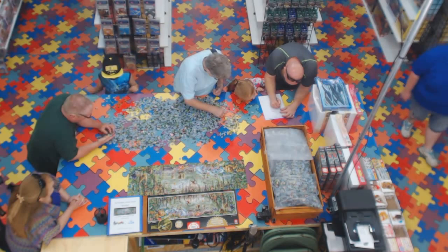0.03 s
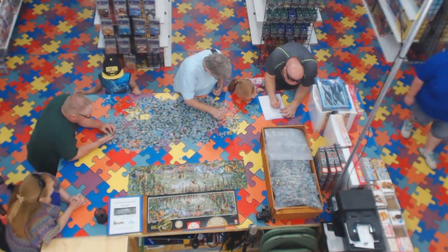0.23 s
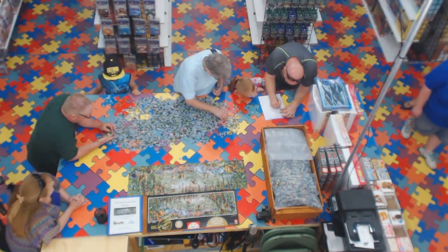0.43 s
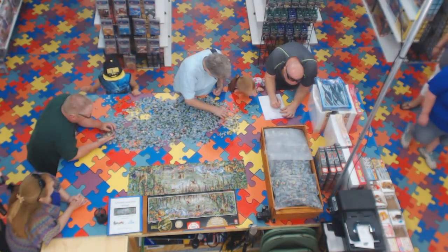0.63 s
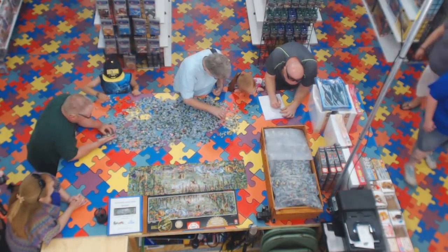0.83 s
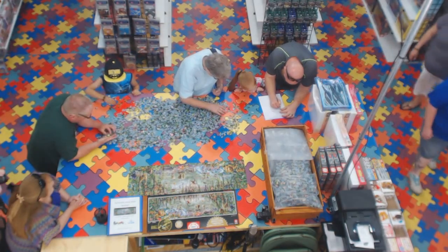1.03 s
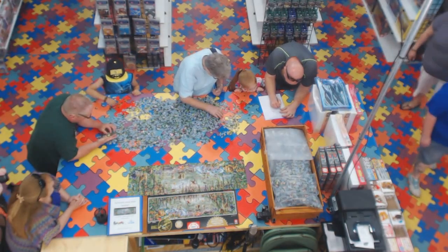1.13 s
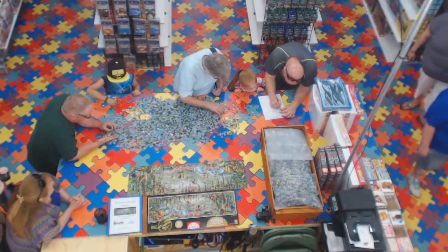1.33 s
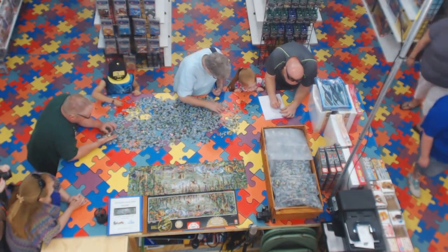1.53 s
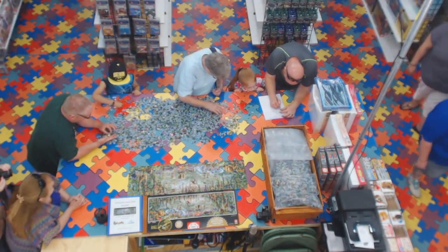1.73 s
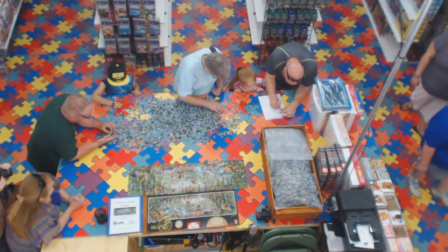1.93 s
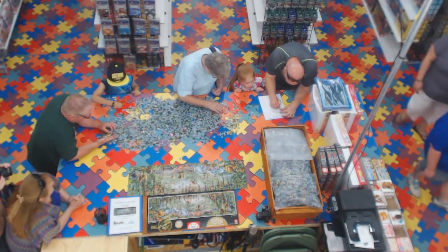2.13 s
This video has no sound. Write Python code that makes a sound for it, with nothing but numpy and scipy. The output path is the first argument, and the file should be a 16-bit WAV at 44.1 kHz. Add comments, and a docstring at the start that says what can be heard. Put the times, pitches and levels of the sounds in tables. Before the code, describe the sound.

Cardboard jigsaw pieces click and clatter sharply, then a hollow box is shoved along the floor

```python
"""Cardboard jigsaw pieces sorted by hand on a shop floor click, scuff and clatter: brief noise bursts are joined
by decaying sine partials. Twice something hollow, probably a puzzle box, is shoved along: stick-slip bumps are
low decaying sines, while grains of friction, filtered into three bands, give its boom, scrape and piece rattle.
Short sine tones, faint to strong, sound with or between the clicks; filtered noise gives a quiet room hum.
A short reverberation surrounds the handling; the narrow-band microphone limits and clips the hardest clicks."""
import sys
import numpy as np
from scipy import signal
from scipy.fft import rfft, irfft, next_fast_len
from scipy.io import wavfile
from scipy.ndimage import uniform_filter1d, minimum_filter1d, map_coordinates

SR = 44100
rng = np.random.default_rng(int(sys.argv[2]) if len(sys.argv) > 2 else 0)


def unload_wav(signal):
    """Save mono or channel-first audio to the path in sys.argv[1] as 16-bit WAV at rate SR, clipped to [-1, 1]."""
    wavfile.write(
        sys.argv[1],
        SR,
        np.round(np.clip(np.atleast_2d(signal).T, -1, 1) * 32767).astype(np.int16),
    )


N = 96402
T = np.arange(N) / SR  # seconds
BAND_HZ = 7600  # upper edge of all filtered noise
RING_DETUNE, RING_ROUGH_RAD = 0.009, 0.3  # random pitch share, random phase


def amp(db):
    """Level to amplitude: 20 dB is a factor of ten."""
    return 10 ** (np.asarray(db) / 20)


def unit(x):
    """Normalisation: scale to an rms of 1."""
    return x / np.sqrt(np.mean(x ** 2) + 1e-20)


def wobble(steps):
    """Random modulation: a smooth curve through one random knot per step."""
    knots = rng.standard_normal(int(steps.max()) + 4)
    return map_coordinates(knots, [steps])


def stroke(t, rise, hold, t60):
    """Exponential build-up and decay: rise, hold, then fall 60 dB in t60 seconds."""
    build_up = 1 - np.exp(-t / rise)
    decay = amp(-60 * np.maximum(t - hold, 0) / t60)
    return build_up * decay


def grains(size, rate, spread_db):
    """Random impulse train: tiny contacts, rate a second, of either sign and uneven size."""
    happens = rng.random(size) < rate / SR
    sign = rng.choice([-1, 1], size)
    return unit(happens * sign * amp(spread_db * rng.standard_normal(size)))


TILT_PIVOT_HZ = 5000


def coloured(x, points, bright_db=0):
    """Spectral shaping: an f/Hz, level/dB curve, tilted by bright_db an octave in the treble, at rms 1."""
    hz = np.fft.rfftfreq(len(x), 1 / SR) + 1
    f, db = np.transpose(points)
    curve = np.interp(np.log(hz), np.log(f), db)
    # below half the pivot the tilt stays level
    octaves = np.log2(np.clip(hz, TILT_PIVOT_HZ / 2, None) / TILT_PIVOT_HZ)
    gain = amp(curve + bright_db * octaves) * (hz < BAND_HZ)
    return unit(irfft(rfft(x) * gain, len(x)))


RAGGED_DB, RAGGED_STEP_HZ = 5, 240


def ragged(x):
    """Individual resonance: every piece has uneven peaks and dips of its own along the spectrum."""
    hz = np.fft.rfftfreq(len(x), 1 / SR)
    gain = amp(RAGGED_DB * wobble(hz / RAGGED_STEP_HZ))
    return unit(irfft(rfft(x) * gain, len(x)))


PATCHY_DB = 3


def patchy(x):
    """Time-varying resonance: patches of the spectrum come and go as the pieces shift."""
    spectrum = signal.stft(x, nperseg=512)[2]
    field = uniform_filter1d(rng.standard_normal(spectrum.shape), size=3, axis=0)  # across frequency
    field = uniform_filter1d(field, size=5, axis=1)  # across time
    gain = amp(PATCHY_DB * unit(field))
    return unit(signal.istft(spectrum * gain, nperseg=512)[1][:len(x)])


def add(track, s, x):
    """Superposition: mix x into track at s seconds."""
    part = track[max(round(s * SR), 0):][:len(x)]
    part += x[:len(part)]


# spectrum of the room hum: f/Hz, level/dB
HUM_SPECTRUM = [(40, -28), (95, -41), (125, 5), (255, 5.5), (410, -5.5), (650, -2.5), (1500, -7),
                (2600, -12), (4600, -14), (7400, -11)]
HUM_DB = -45.5


def room_hum():
    """Stationary noise: random noise shaped into the hum of a quiet room."""
    return amp(HUM_DB) * coloured(rng.standard_normal(N), HUM_SPECTRUM)


# partials of the short ring in clicks and scuffs, before random scatter: f/Hz, level/dB
RING_PARTIALS = [(680, -19.5), (4030, -8.5), (6030, -12), (6700, -13)]
RING_SCATTER_DB = 2
RING_SHARP, RING_SETTLE_S = 0.04, 0.008  # share of the pitch at the start, time constant
RING_T60_S, RING_PIVOT_HZ, RING_DAMPING = 0.085, 700, 0.3  # T60 at the pivot, exponent of its fall


def ring(t, hold):
    """Additive synthesis: sine partials build up, sag slightly in pitch and decay; higher ones die sooner."""
    settled = t + RING_SHARP * RING_SETTLE_S * (1 - np.exp(-t / RING_SETTLE_S))
    out = np.zeros(len(t))
    for hz, db in RING_PARTIALS:
        level = amp(db + RING_SCATTER_DB * rng.normal())
        t60 = RING_T60_S * (RING_PIVOT_HZ / hz) ** RING_DAMPING
        pitch = hz * (1 + RING_DETUNE * rng.normal())
        phase = 2 * np.pi * (pitch * settled + rng.random())
        roughness = RING_ROUGH_RAD * wobble(t * 200)
        out += level * stroke(t, hold / 2, hold, t60) * np.sin(phase + roughness)
    return out


CLICK_RISE_S = 0.00022
HOLLOW_HZ, HOLLOW_T60_S = 1992, 0.057  # pitch once settled
OVERTONE_DB, FLUTTER_DB = -16, 2.4
# two-step settling of the hollow tone, which starts sharp: excess pitch/share, time constant/s
HOLLOW_SETTLING = [(0.55, 0.001), (0.13, 0.0087)]


def hollow(t, hold):
    """Frequency glide: a fluttering hollow tone and its octave drop quickly onto their pitch."""
    excess = sum(share * np.exp(-t / tau) for share, tau in HOLLOW_SETTLING)
    hz = HOLLOW_HZ * (1 + RING_DETUNE * wobble(t * 150) + excess)
    phase = 2 * np.pi * np.cumsum(hz) / SR
    tone = np.sin(phase) + amp(OVERTONE_DB) * np.sin(2 * phase)
    flutter = amp(FLUTTER_DB * wobble(t * 400))
    return flutter * stroke(t, CLICK_RISE_S, hold, HOLLOW_T60_S) * tone


# noise spectrum of cardboard contact, in scuffs and clicks, before tilt: f/Hz, level/dB
CARDBOARD_SPECTRUM = [(100, -26.5), (400, -12), (680, -2), (1100, -9.5), (1600, -5.5), (2900, -1.5),
                      (5200, 0), (6700, 0), (7500, -3.5)]
# pieces scuffing over each other: t/s, length/s, level/dB, treble tilt/dB per octave
SCUFF_EVENTS = [(.008, 0.035, -30, 13), (0.145, 0.029, -21, -18), (0.191, 0.044, -35.5, 1),
                (0.274, 0.035, -24.5, 7), (0.351, 0.05, -18.5, 5.5), (0.431, 0.044, -29, 7),
                (0.969, 0.029, -24.5, -2), (1.498, 0.044, -25.5, 7), (1.733, 0.048, -27, -3.5),
                (1.882, 0.043, -43, -5.5), (1.994, 0.043, -29.5, -8.5), (2.121, 0.031, -30, -14)]
SCUFF_RISE_S, SCUFF_T60_S = 0.01, 0.042


def scuffs():
    """Friction: cut edges catch on each other in a quick run of grains, joined by ringing partials."""
    out, t = np.zeros(N), T[:SR // 5]
    for s, length, db, bright_db in SCUFF_EVENTS:
        catches = grains(len(t), rate=2000, spread_db=0.5)
        rub = patchy(ragged(coloured(catches, CARDBOARD_SPECTRUM, bright_db)))
        rub = rub * stroke(t, SCUFF_RISE_S, length, SCUFF_T60_S)
        ringing = amp(3.0) * ring(t, length)
        hollow_tone = amp(-14.5) * hollow(t, length) * (1 - np.exp(-t / SCUFF_RISE_S))
        add(out, s, amp(db) * (rub + ringing + hollow_tone))
    return out


# pieces clicking: t/s, level/dB, contact length/s, hollow tone level/dB, treble tilt/dB per octave
CLICK_EVENTS = [(0.013, -29, 0.026, -30, 6.5), (0.032, -15, 0.001, -34, 29), (0.163, 10.5, 0.0037, -15, 10),
                (0.197, -26.5, 0.0016, -59, 3), (.203, -20, 0.00066, -48, 8), (.210, -33, 0.002, -51, 5),
                (0.235, -23.5, 0.01, -36, 8), (0.2913, -8.5, 0.0027, -24, 29),
                (0.315, -17.5, 0.013, -22.5, 10), (0.333, -12.5, 0.0033, -19, -0.5),
                (0.3394, 9, 0.0025, -3, 3), (0.3418, 1.5, 0.0085, -3.5, 5.5), (0.364, -14, 0.0044, -37, 10),
                (.374, -16, 0.0025, -46, 1), (0.383, -4, 0.0057, -44, 12), (.400, -22.5, 0.001, -39, 13),
                (0.439, -22, 0.0091, -58, 15), (.456, -26.5, 0.0026, -37.5, 11),
                (0.645, -21, 0.023, -49, 3), (0.674, -20, 0.015, -41.5, 0), (0.816, -20, 0.0035, -21, -17),
                (0.845, -25.5, 0.0042, -25, 8), (.920, -22.5, 0.0062, -42.5, -4),
                (.957, -26, 0.0076, -45, -1), (0.986, -21, 0.0047, -39, 8), (1.09, -32, 0.021, -38.5, -45),
                (1.156, -38, 0.0024, -53, -5.5), (1.215, -40, 0.0098, -56, 9),
                (1.439, -34.5, 0.0012, -70, -4), (1.4947, -17, 0.0048, -56, 11),
                (1.5059, -15, 0.0045, -37, 8.5), (1.528, -23, 0.0029, -45, 1.5),
                (1.5997, -15, 0.0051, -25, 18), (1.731, -23.5, 0.0051, -47, 2.5),
                (1.74, -11, 0.00089, -33, 7), (1.762, -26.5, 0.0073, -31, 6),
                (1.781, -15.5, 0.0013, -35, 1), (1.791, -22.5, 0.0077, -30.5, 5),
                (1.851, -38.5, 0.0022, -51, 3), (1.9, -24, 0.0075, -47, 8.5),
                (1.9972, -31.5, 0.014, -38, -5), (2.0483, -29, 0.0063, -18.5, -27),
                (2.122, -32, .003, -43, -6), (2.136, -30, 0.0054, -38, -3)]
CLICK_T60_S = 0.012
RING_LIMIT_DB = -9  # the ring's gain saturates towards this level in hard clicks


def clicks():
    """Impact: each click is a brief noise burst of contact chatter, a short ring and a hollow tone."""
    out, t = np.zeros(N), T[:SR // 5]
    for s, db, hold, hollow_db, bright_db in CLICK_EVENTS:
        contact = stroke(t, CLICK_RISE_S, hold, CLICK_T60_S)
        noise = ragged(coloured(rng.standard_normal(len(t)), CARDBOARD_SPECTRUM, bright_db))
        chatter = unit(noise * contact) * np.sqrt(np.mean(contact ** 2))
        ringing = ring(t, hold) / np.sqrt(1 + amp(db - RING_LIMIT_DB) ** 2)
        add(out, s, amp(db) * (chatter + ringing) + amp(hollow_db) * hollow(t, hold))
    return out


# short sine tones, faint to strong, with or between the clicks: t/s, level/dB, f/Hz, length/s
TONE_EVENTS = [(0.069, -39, 765, 0.029), (0.344, -12, 574, .003), (0.344, -2, 6060, .003),
               (0.376, -20, 639.5, 0.012), (0.977, -26.5, 640, 0.019), (.99, -39.5, 242, 0.077),
               (0.995, -19.5, 4020, 0.0028), (1.0, -28, 1228, 0.025), (1.032, -27.5, 950, 0.014),
               (1.599, -19, 3865, 0.0034), (1.685, -35.5, 144, 0.048), (1.871, -32.5, 722, 0.015),
               (2.051, -28.5, 705, 0.0057)]
TONE_RISE_S, TONE_T60_S = 0.002, 0.048


def tones():
    """Damped oscillation: short sine tones, faint to strong, slightly rough in phase."""
    out, t = np.zeros(N), T[:SR // 4]
    for s, db, hz, length in TONE_EVENTS:
        roughness = RING_ROUGH_RAD * wobble(t * 120)
        tone = np.sin(2 * np.pi * hz * t + roughness)
        add(out, s, amp(db) * tone * stroke(t, TONE_RISE_S, length, TONE_T60_S))
    return out


# noise spectrum of the box's boom: f/Hz, level/dB
BOOM_SPECTRUM = [(60, -53), (105, -54), (150, -1), (180, -12), (245, -8.5), (288, 4), (325, -10),
                 (360, 0.5), (450, -13), (700, -37)]
# noise spectrum of the box's scrape: f/Hz, level/dB
SCRAPE_SPECTRUM = [(280, -51), (440, -21.5), (550, -1.5), (720, -1.5), (1050, -6.5), (1200, 0),
                   (1450, -10.5), (1640, -5.5), (1900, -26.5), (3000, -29.5)]
# noise spectrum of the loose pieces' treble rattle: f/Hz, level/dB
RATTLE_SPECTRUM = [(1100, -14), (1900, 14.5), (2600, 9), (3500, 11), (5000, 2.5), (7000, 6), (8000, -33.5)]
# course of the two shoves, levels before the gains below: t/s, boom level/dB, scrape level/dB, rattle level/dB
SHOVE_COURSES = [
    [(.61, -55, -51, -36.5), (.635, -27, -23, -34), (.70, -24, -26, -27.5), (.76, -17, -15.5, -24.5),
     (.82, -19.5, -18, -19), (.885, -31, -22, -28.5), (.94, -40.5, -34, -33), (1.03, -58, -44, -42.5),
     (1.12, -59, -38.5, -50)],
    [(1.538, -34, -39, -46), (1.56, -37, -29, -71), (1.61, -20.5, -21.5, -35), (1.66, -26, -30.5, -74),
     (1.72, -42.5, -33.5, -40), (1.80, -72, -41.5, -51)],
]
BOOM_DB, SCRAPE_DB, RATTLE_DB = 4, 1.5, -2


def shoves():
    """Sliding friction: grains of contact make the box boom and scrape while the pieces rattle."""
    out = np.zeros(N)
    for course in SHOVE_COURSES:
        s, *levels = np.transpose(course)
        gate = np.interp(T, [s[0] - 0.01, s[0], s[-1], s[-1] + 0.02], [0, 1, 1, 0])
        boom_env, scrape_env, rattle_env = [gate * amp(np.interp(T, s, db)) for db in levels]
        boom = coloured(grains(N, rate=1800, spread_db=0), BOOM_SPECTRUM)
        scrape = patchy(coloured(grains(N, rate=4000, spread_db=2.5), SCRAPE_SPECTRUM))
        rattle = patchy(coloured(grains(N, rate=1100, spread_db=4), RATTLE_SPECTRUM))
        out += amp(BOOM_DB) * boom_env * boom
        out += amp(SCRAPE_DB) * scrape_env * scrape
        out += amp(RATTLE_DB) * rattle_env * rattle
    return out


# slips of the juddering box: t/s, level/dB, f/Hz
BUMP_EVENTS = [(0.6237, -8.5, 316), (0.647, 0, 300.5), (0.682, -7.5, 286), (0.706, -7, 280),
               (0.7358, 0, 534.5), (0.741, 1.5, 283), (0.771, -3.5, 325), (1.542, -6.5, 277.4),
               (1.5618, -0.5, 281), (1.582, -3, 275), (1.605, -6.5, 254)]
BUMP_RISE_S, BUMP_T60_S = 0.0056, 0.051


def bumps():
    """Stick-slip: the box catches and slips; each slip rings its panel for a few cycles."""
    out, t = np.zeros(N), T[:SR // 5]
    for s, db, hz in BUMP_EVENTS:
        panel = np.sin(2 * np.pi * hz * t)
        add(out, s, amp(db) * panel * stroke(t, BUMP_RISE_S, BUMP_RISE_S, BUMP_T60_S))
    return out


ROOM_T60_S, ROOM_DB = 0.16, -21.5


def room(x):
    """Reverberation: convolution with decaying noise gives the short answer of a carpeted shop."""
    t = T[:SR // 2]
    tail = rng.standard_normal(len(t)) * stroke(t, 0.002, 0, ROOM_T60_S)
    return signal.fftconvolve(x, tail / np.linalg.norm(tail))[:N]


def scene():
    """Superposition: pieces and box in the room, over its hum."""
    hum = room_hum()
    handling = scuffs() + clicks() + tones() + shoves() + bumps()
    return (handling + amp(ROOM_DB) * room(handling) + hum)[None]


def lowpass(x, hz, order):
    """Band limitation: a steep low-pass without phase shift."""
    size = next_fast_len(N + SR // 5)
    f = np.fft.rfftfreq(size, 1 / SR)
    gain = 1 / np.sqrt(1 + (f / hz) ** (2 * order))
    return irfft(rfft(x, size) * gain, size)[..., :N]


KNEE, SQUEEZE, RECOVER_S = 0.72, 0.68, 0.016  # amplitude, exponent of gain reduction, window length


def limited(x):
    """Dynamic compression: the gain ducks on peaks above the knee and soon recovers."""
    size = int(RECOVER_S * SR)
    needed = (np.maximum(np.abs(x), KNEE) / KNEE) ** -SQUEEZE
    held = minimum_filter1d(needed, size, origin=size * 3 // 8)  # mostly holds after the peak
    return x * uniform_filter1d(held, size // 5)


CEILING, TOP_HZ = 1.06, 16000  # clipping amplitude, low-pass after clipping


def record(dry):
    """Overload: a narrow-band microphone with a gentle limiter; the loudest peaks still clip."""
    narrow = lowpass(dry, BAND_HZ - 100, order=40)
    clipped = np.clip(limited(narrow), -CEILING, CEILING)
    return lowpass(clipped, TOP_HZ, order=40)


dry = scene()
out = record(dry)
unload_wav(out)
```